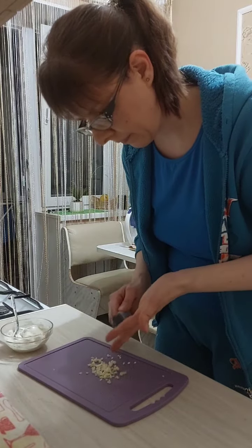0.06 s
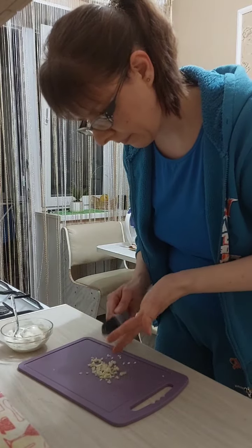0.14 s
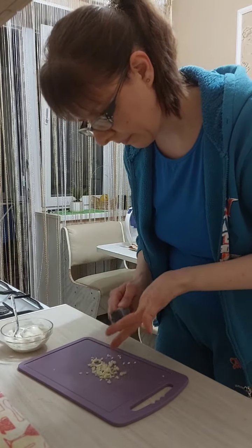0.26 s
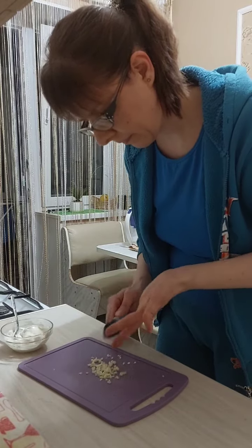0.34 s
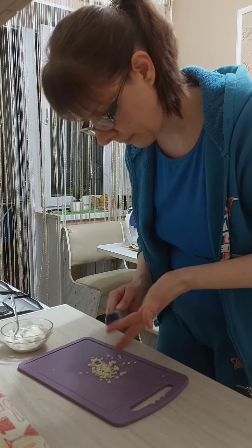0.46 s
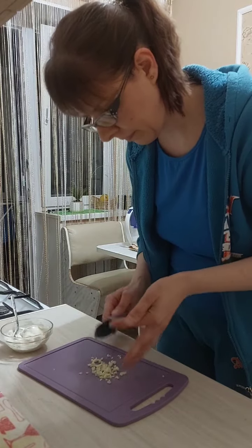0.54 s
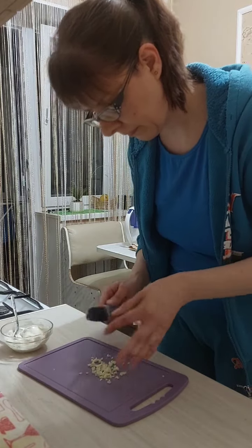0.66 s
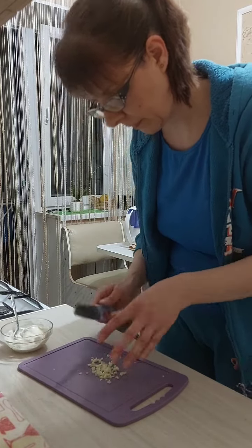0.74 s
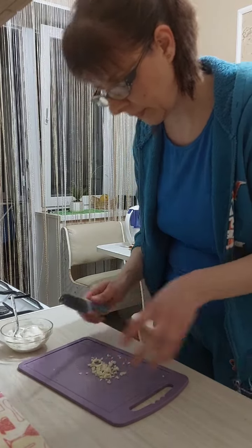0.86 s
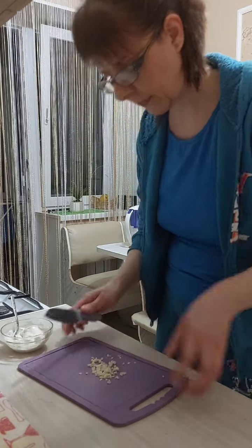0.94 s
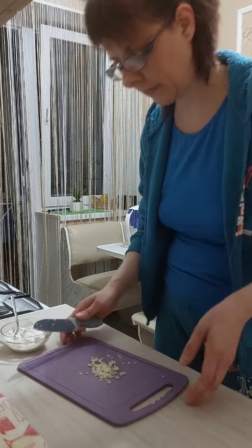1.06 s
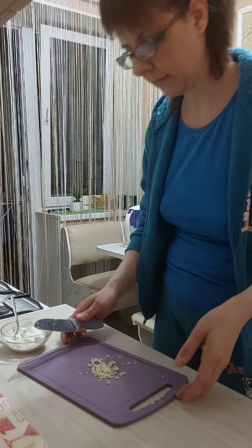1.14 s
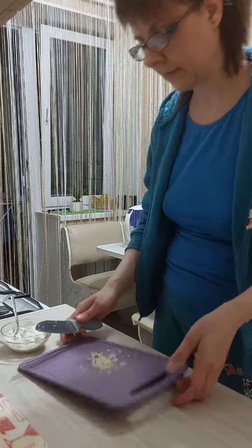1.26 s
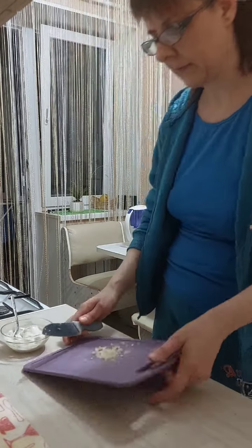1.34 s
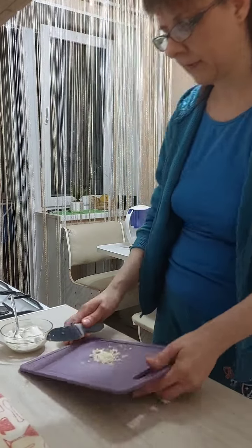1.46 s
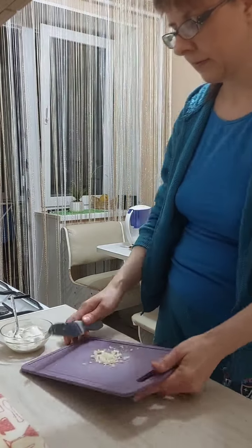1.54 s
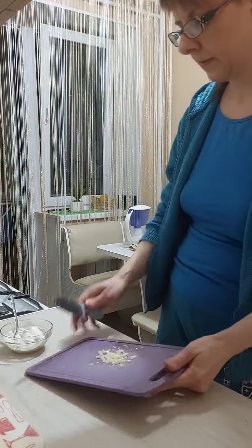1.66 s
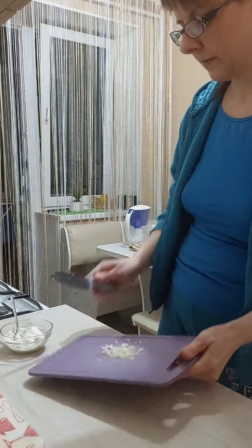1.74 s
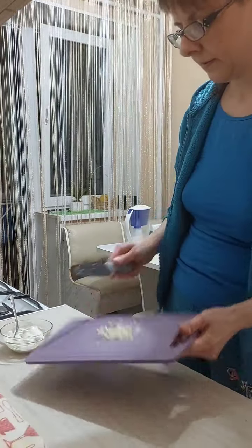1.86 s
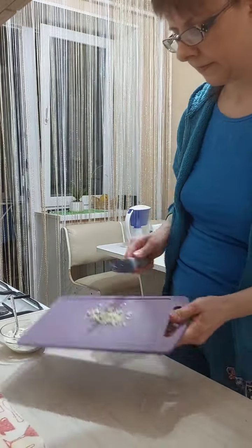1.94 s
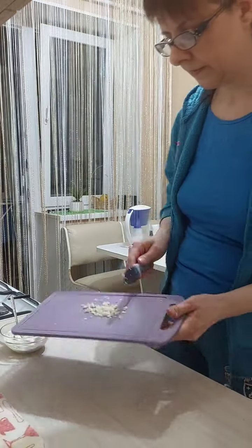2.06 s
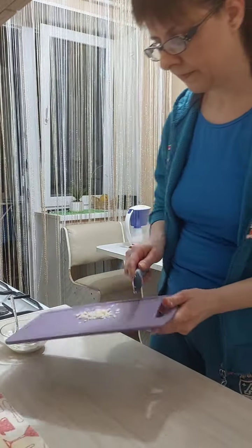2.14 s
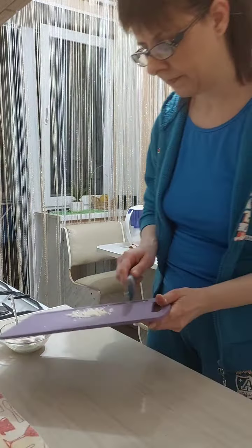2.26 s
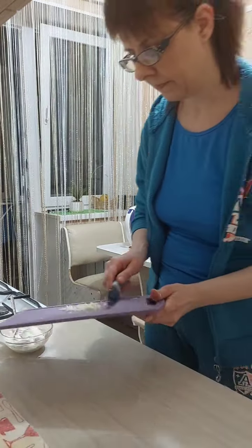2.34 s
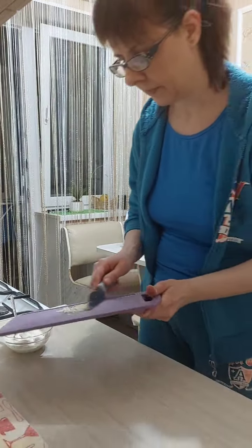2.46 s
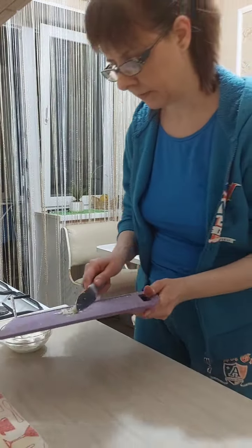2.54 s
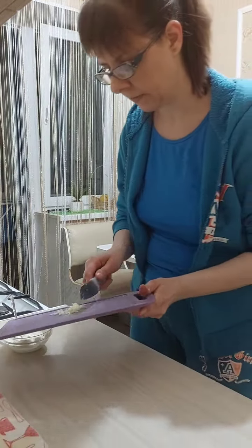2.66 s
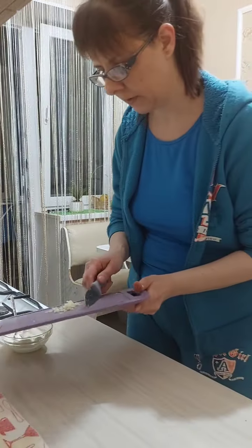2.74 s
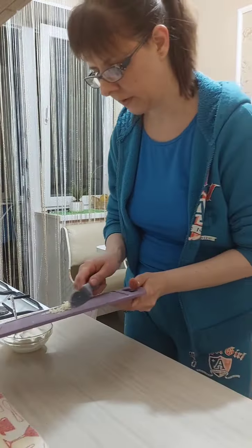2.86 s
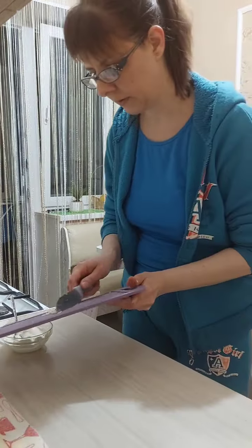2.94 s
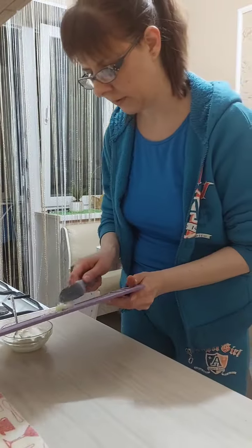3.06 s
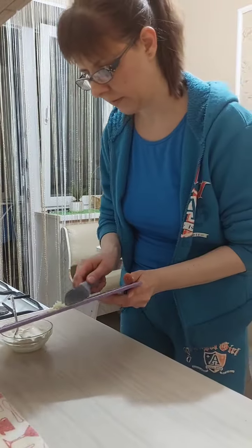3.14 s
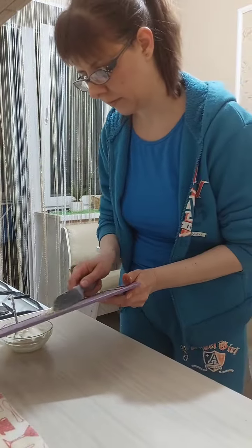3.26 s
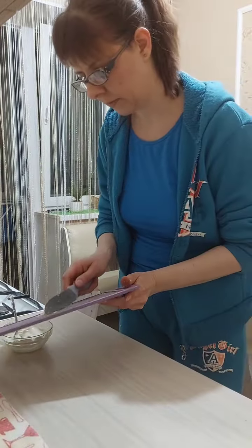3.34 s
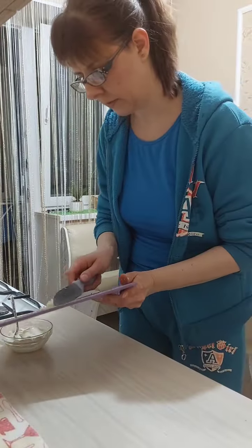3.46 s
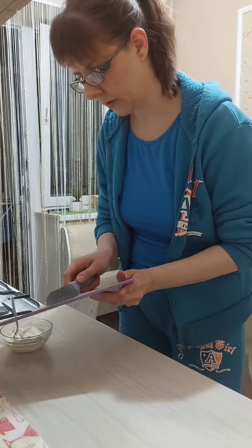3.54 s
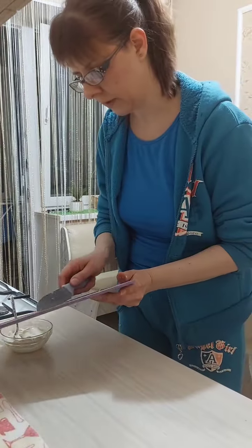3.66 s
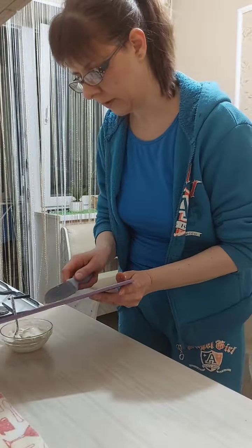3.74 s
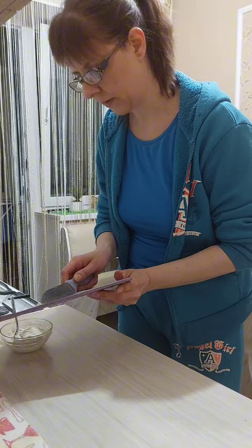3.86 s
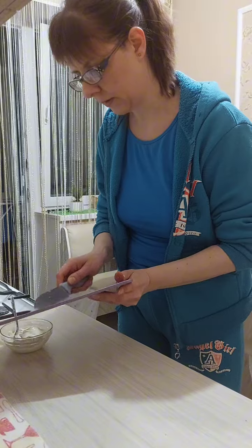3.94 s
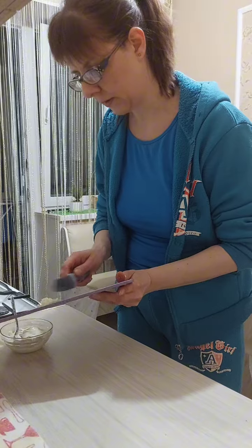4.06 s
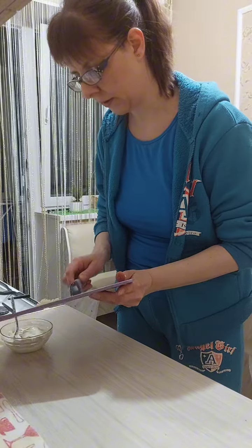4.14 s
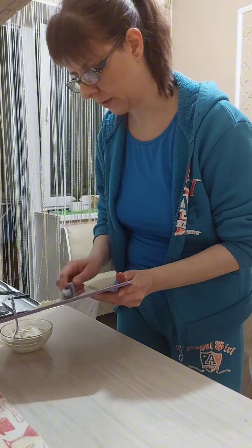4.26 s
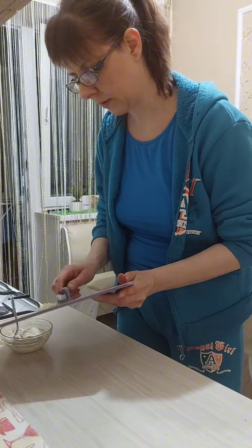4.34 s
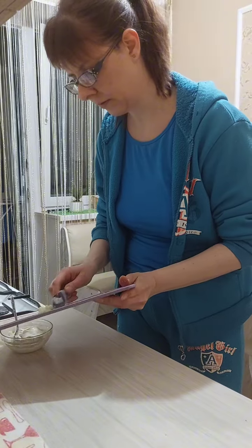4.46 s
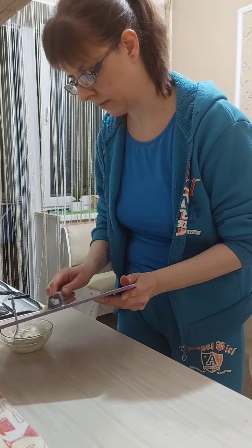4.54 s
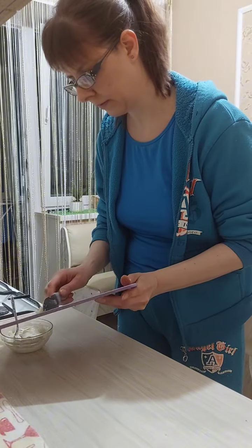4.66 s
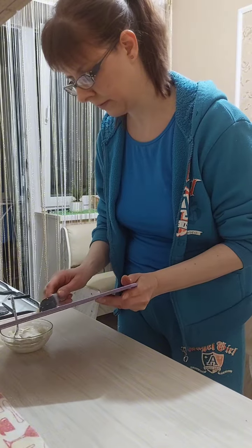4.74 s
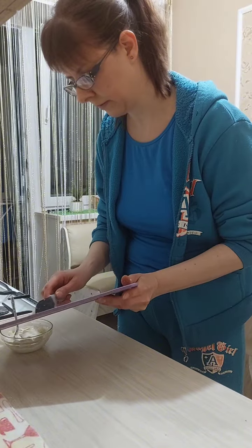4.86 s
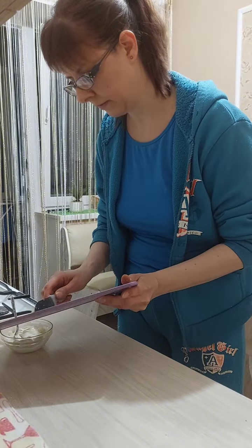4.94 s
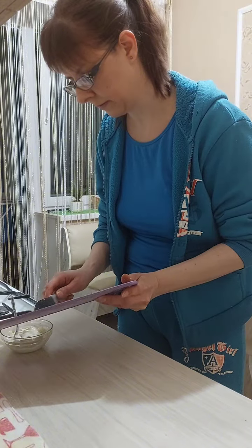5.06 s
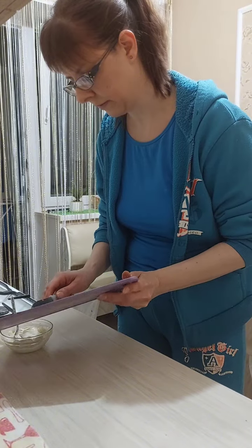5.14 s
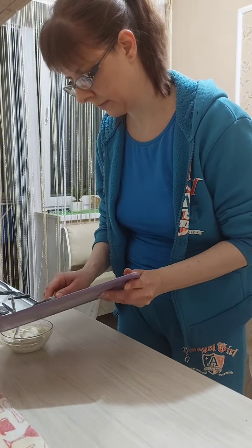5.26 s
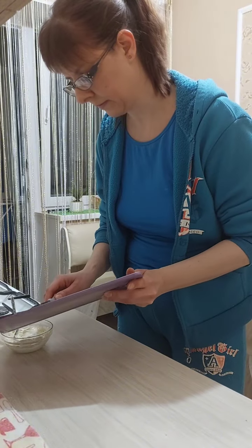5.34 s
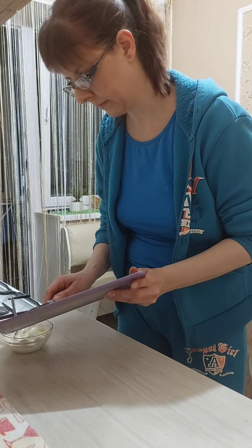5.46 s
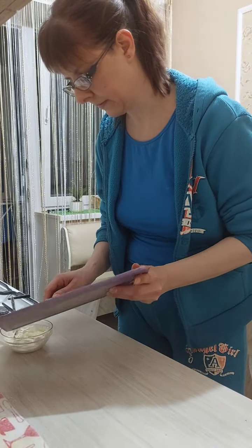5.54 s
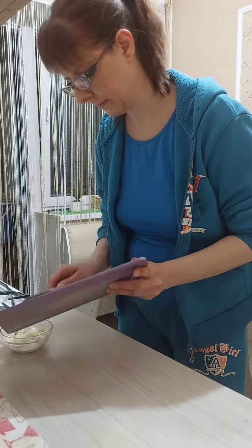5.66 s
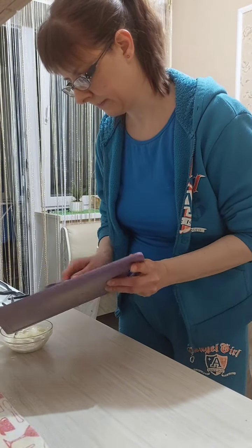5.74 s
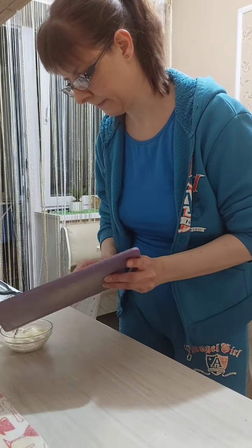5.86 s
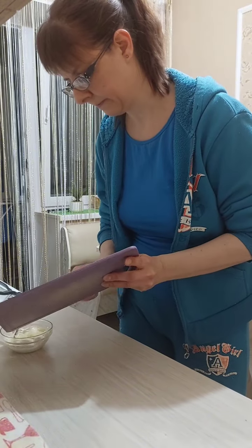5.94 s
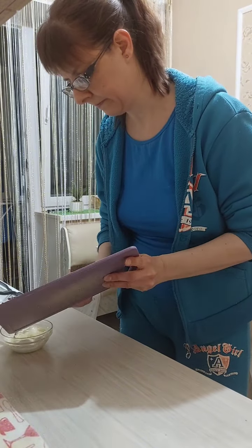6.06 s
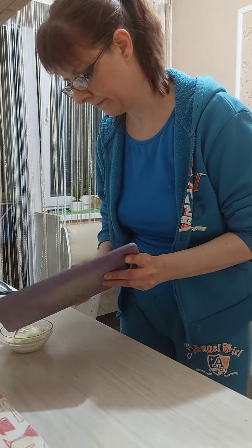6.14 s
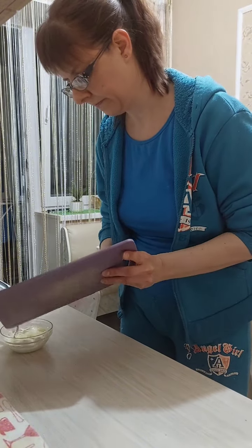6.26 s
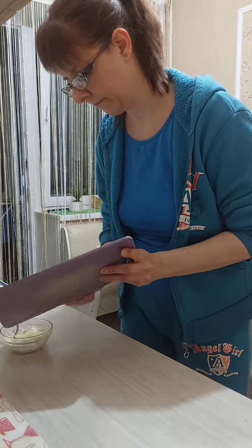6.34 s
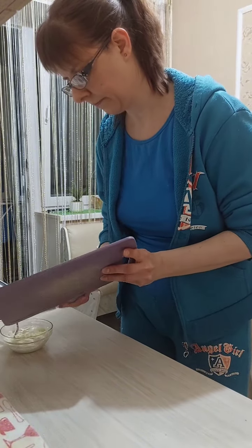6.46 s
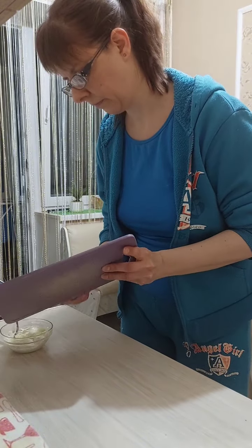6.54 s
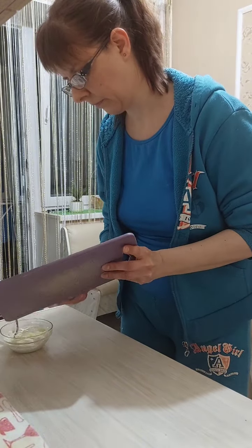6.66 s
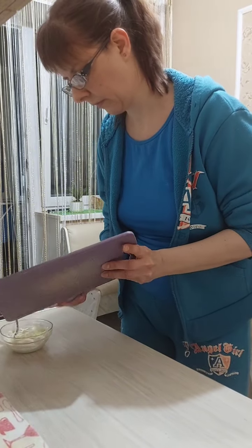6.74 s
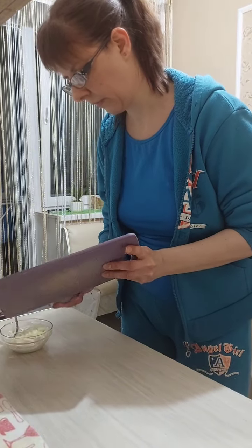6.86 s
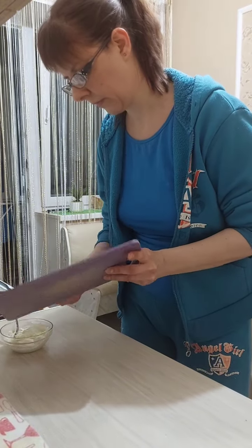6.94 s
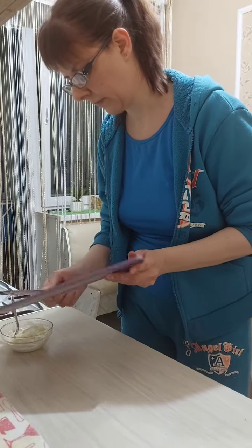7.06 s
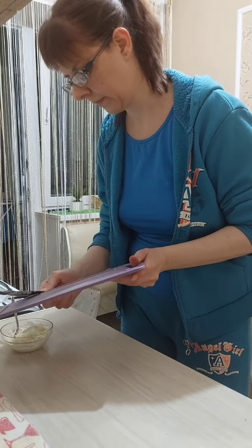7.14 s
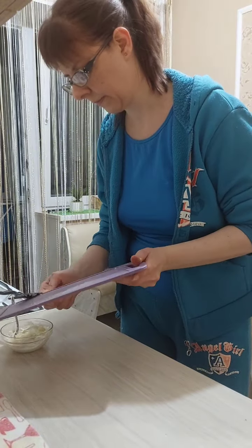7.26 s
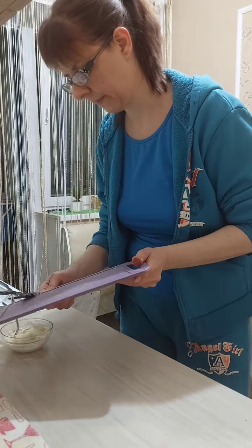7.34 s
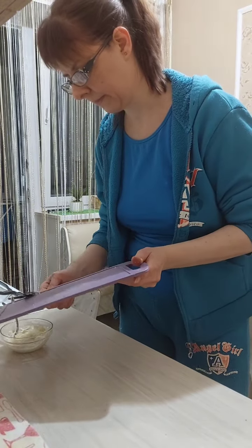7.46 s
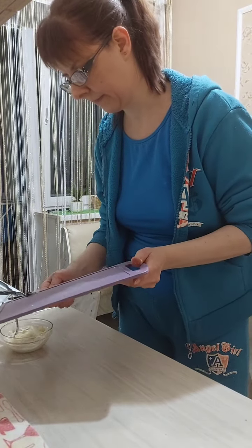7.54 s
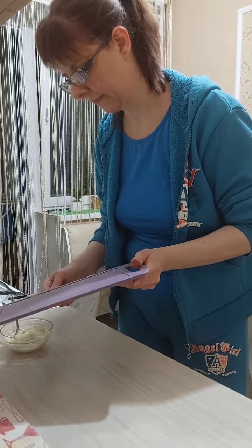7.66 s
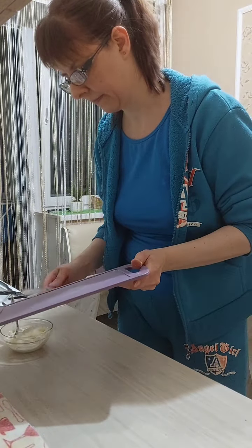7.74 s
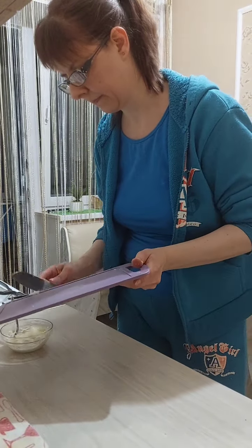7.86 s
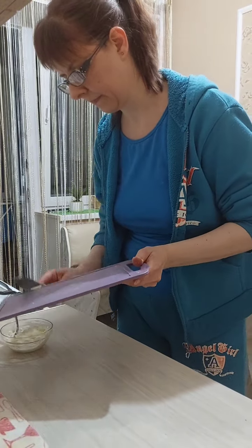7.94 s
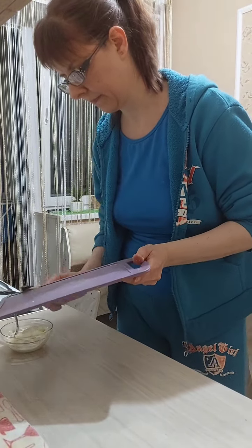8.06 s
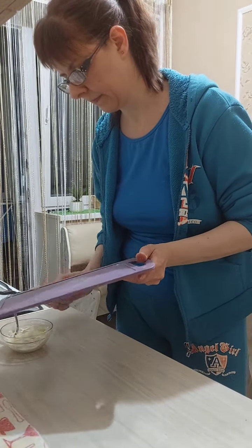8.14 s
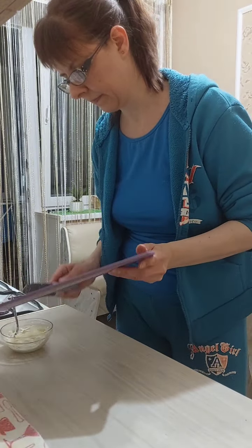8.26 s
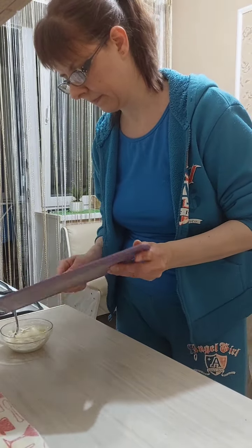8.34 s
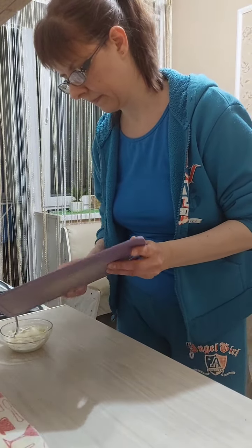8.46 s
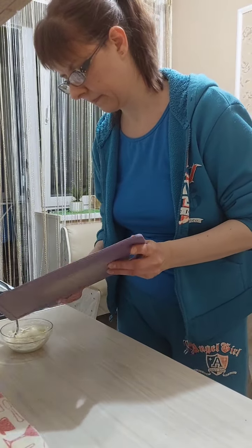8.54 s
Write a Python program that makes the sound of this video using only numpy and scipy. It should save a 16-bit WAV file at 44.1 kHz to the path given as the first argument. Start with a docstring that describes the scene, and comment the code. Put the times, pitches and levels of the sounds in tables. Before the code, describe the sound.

Knife scraping minced garlic off a hollow-sounding plastic board, each stroke starting with a knock, one longer drag midway, in a small humming kitchen.

```python
"""Garlic swept off a cutting board

A plastic board is lifted off a kitchen table; a knife sweeps minced garlic from it into a bowl.
Blade knocks and light taps: noise cracks plus board modes. Slides: random slips, direct and through the board.
Bumps, blurred rings, steel pings, brief squeaks and stick-slip groans: decaying or gliding tones and narrow noise.
A small hard room rings after every sound; a mains appliance hums throughout over rumble and hiss.
"""
import sys
import numpy as np
from scipy import signal
from scipy.fft import rfft, irfft
from scipy.io import wavfile
from scipy.ndimage import map_coordinates

SR = 44100
rng = np.random.default_rng(int(sys.argv[2]) if len(sys.argv) > 2 else 0)


def digitize_waveform(pressure):
    """Quantize a signal to 16-bit integers and store it at the path in sys.argv[1].

    Rows of a 2-D input are taken as channels; values are limited to [-1, 1].
    """
    field = np.atleast_2d(pressure).T
    bounded = np.clip(field, -1, 1)
    quanta = np.round(bounded * 32767).astype(np.int16)
    wavfile.write(sys.argv[1], SR, quanta)


N = 379260

# appliance hum and background spectra: freq_hz, density_db
HUM_HZ, HUM_DB = 100, -37.5
RUMBLE_SPECTRUM = [(20, -25.5), (35, -46), (48, 19.5), (65, 5), (85, 11), (120, 11), (150, 7.5),
                   (220, -54.5)]
AIR_SPECTRUM = [(94, -16.5), (160, -8), (244, -12), (285, -10.5), (571, -27), (653, -29.5), (1020, -38),
                (5870, -51), (11100, -42.5), (16000, -48.5)]

# slides of blade, finger or board; levels at full speed, before hand pressure:
# start_s, speed_up_s, run_s, ease_off_s, rub_db, drag_db, rasp_db, grit_db, hiss_db
STROKES = [(0.09, 0.018, 0.01, 0.03, -99, -84, -89, -85, -77),
           (0.33, 0.015, 0.009, 0.028, -88, -89, -93, -87, -67),
           (1.29, 0.0035, 0.0055, 0.075, -54, -47.5, -47, -58, -55),
           (1.421, 0.02, 0.011, 0.05, -55, -52.5, -50, -58, -58.5),
           (1.615, 0.0088, 0.012, 0.022, -64, -60, -55.5, -60.5, -58),
           (1.719, 0.067, 0.088, 0.11, -61, -74, -82, -73.5, -66),
           (2.35, 0.12, 0.033, 0.039, -47, -39, -35, -40, -42.5),
           (2.8, 0.1, 0.028, 0.057, -48.5, -41, -42.5, -48, -48.5),
           (3.181, 0.078, 0.027, 0.065, -44, -39.5, -42.5, -45.5, -46),
           (3.5, 0.1, 0.03, 0.026, -42.5, -40, -40, -47.5, -46),
           (3.82, 0.08, 0.042, 0.022, -42, -40.5, -39.5, -45, -45),
           (4.076, 0.0034, 0.0041, 0.0094, -42, -35.5, -49.5, -63, -77),
           (4.169, 0.056, 0.42, 0.13, -42, -38, -40.5, -50.5, -51.5),
           (4.71, 0.035, 0.084, 0.07, -46.5, -50.5, -54, -66.5, -68),
           (5.131, 0.0086, 0.078, 0.064, -46.5, -50.5, -51, -59.5, -58),
           (5.27, 0.13, 0.13, 0.01, -55.5, -46, -44.5, -56, -52),
           (5.88, 0.13, 0.039, 0.04, -40, -39.5, -36.5, -43.5, -40),
           (6.348, 0.01, 0.054, 0.031, -45, -42, -38, -42, -35),
           (6.587, 0.015, 0.011, 0.02, -49, -44, -34.5, -43.5, -37.5),
           (6.773, 0.009, 0.01, 0.012, -55.5, -59, -37.5, -40.5, -31.5),
           (7.15, 0.024, 0.046, 0.034, -64.5, -56, -59, -65, -59),
           (7.247, 0.0035, 0.024, 0.087, -66.5, -64, -74, -68.5, -54),
           (7.42, 0.049, 0.14, 0.034, -80, -84, -86, -94, -66),
           (7.59, 0.016, 0.014, 0.011, -85, -87, -79, -70, -64),
           (7.657, 0.004, 0.007, 0.015, -76, -80, -65.5, -66, -57),
           (7.683, 0.0045, 0.0069, 0.011, -75, -57.5, -61, -69, -68),
           (8.02, 0.012, 0.085, 0.012, -53.5, -64, -52.5, -52.5, -51),
           (8.44, 0.073, 0.069, 0.033, -48, -45, -36.5, -42, -36)]
SCRAPE_SPLITS_HZ = (600, 1100, 2900, 5200)
# level at rest relative to full speed: rub_db, drag_db, rasp_db, grit_db, hiss_db
SLOW_DB = (-5.5, -4.5, -11, -10.5, -17)
TIRING_DB_PER_S = -11.5  # the hand presses less as the stroke goes on
EASE_OFF_DB = -13  # further pressure fall from end of run to lift
SLOWING = 0.52  # share of speed lost during ease-off
# a lighter, hissier slide reaches higher: treble tilt per dB of hiss over drag
SHEEN_DB_PER_DB, SHEEN_EVEN_DB, SHEEN_HZ = 0.2, -14, (10000, 13500)
# friction spectrum: freq_hz, density_db
SCRAPE_SPECTRUM = [(120, -56), (300, 5), (850, 4.5), (1130, 1), (1500, -2), (2600, -10), (3300, -7),
                   (4600, -15), (5400, -12), (8500, -5.5), (11700, -4), (13700, -14.5), (15200, -17),
                   (16000, -30)]
# steel blade resonances while dragging: freq_hz, width_hz, level_db
BLADE_RESONANCES = [(2625, 150, -24), (4360, 520, -20.5), (11600, 1000, -21)]
# modes of the hand-held board with the blade on it: freq_hz, level_db, t60_s
BOARD_MODES = [(290.7, 0, 0.16), (464, -1, 0.12), (504.7, 9.5, 0.15), (686.5, -2.5, 0.15),
               (768, 12.5, 0.05), (945.3, 4.5, 0.088), (1291, -5, 0.12), (1467, -14, 0.013),
               (1670, 1.5, 0.063), (1942, -6, 0.07), (2211, -0.5, 0.052), (2552, -10.5, 0.017),
               (2834, -14, 0.026), (4460, -6.5, 0.01)]

# faint squeaks on the wet blade: start_s, end_s, pitch_hz, level_db
SQUEAKS = [(0.353, 0.365, 4000, -70), (0.35, 0.362, 2980, -78), (0.5, 0.51, 3960, -72),
           (0.503, 0.512, 2730, -75), (5.045, 5.155, 3120, -81)]

# light taps of fingers, blade and board: start_s, boom_db, thud_db, clack_db, tick_db
TAPS = [(0.5, -83, -85, -76, -71.5), (1.018, -54, -66, -77, -73), (1.284, -59, -62, -50, -62),
        (1.291, -47.5, -51, -42, -48.5), (1.299, -55, -45.5, -55, -61), (1.31, -69, -55, -60, -65),
        (1.345, -49, -66, -52, -49), (1.456, -57, -62, -58, -59), (1.513, -67, -51, -50.5, -56.5),
        (1.611, -52, -52, -48, -65), (2.165, -68.5, -70, -86, -83), (4.056, -59, -47.5, -54, -68)]
# blade landing on the board: start_s, boom_db, thud_db, clack_db, tick_db
KNOCKS = [(2.33, -40.5, -24.5, -21, -31.5), (2.779, -41, -29.5, -33.0, -54),
          (3.162, -36.5, -28, -28.5, -48.5), (3.481, -35, -28, -29, -48.5),
          (3.804, -37, -30.5, -30.5, -53.5), (4.149, -41, -24, -25.5, -44), (5.849, -32.5, -24.5, -32, -56),
          (6.289, -33.5, -24, -30.5, -46), (6.576, -35, -32.5, -29.0, -47),
          (6.761, -33, -33.5, -26.5, -36.5), (7.13, -56, -40, -47, -46), (7.999, -40.5, -54, -35, -40.5),
          (8.408, -39, -41, -39.0, -50)]
KNOCK_SPLITS_HZ = (380, 1200, 5500)
# contact noise spectra: freq_hz, density_db
TAP_SPECTRUM = [(100, -21.5), (300, -5.5), (800, -3), (1500, 3.5), (2400, 0.5), (3500, -6), (4800, -9),
                (6000, -17.5), (11500, -18), (14000, -26)]
KNOCK_SPECTRUM = [(100, -28.5), (280, -21.5), (700, 4), (1150, -7), (2400, -2.5), (3400, -21.5),
                  (4600, -14), (5400, -23), (8500, -21.5), (11500, -19), (13500, -29), (16000, -58)]

# soft bumps of hand and board on the table: start_s, pitch_hz, level_db
BUMPS = [(0.999, 135, -39.5), (1.128, 148.6, -37), (1.291, 130, -37.5), (1.482, 136, -41),
         (1.608, 110.4, -35)]
# faint rings as the board is picked up, pressed and tilted: start_s, pitch_hz, level_db, t60_s
RINGS = [(1.51, 851, -60, 3.4), (1.60, 522, -52, 0.97), (2.168, 800, -64, 2.5), (2.42, 980, -43, 0.43),
         (6.77, 570, -50.5, 0.55), (6.77, 955, -54, 1.5)]

# the blade edge is clipped and the steel rings: start_s, level_db
PINGS = [(1.291, -57), (1.346, -56), (2.33, -38), (7.999, -42)]
# free blade modes: freq_hz, level_db, t60_s
STEEL_MODES = [(1868, 2, .14), (2210, 1.5, 0.29), (2470, -2.5, .16), (3348, -7.5, .2), (4680, -12.5, .4),
               (4960, -14, .4)]

# stick-slip groans: start_s, end_s, first_hz, last_hz, level_db, step_per_overtone_db
JUDDERS = [(2.3, 2.447, 171, 176.4, -48.5, -2), (2.42, 2.58, 196.3, 210, -46.5, -26.5),
           (2.794, 2.832, 254.4, 220.6, -38.5, -1.5), (2.827, 2.929, 453, 457, -41.5, -7),
           (2.92, 2.996, 228, 210, -54, -23), (3.58, 3.694, 182.6, 154.3, -44.5, -9.5),
           (3.856, 3.942, 424, 394, -42, -33.5), (3.857, 3.98, 202, 199.4, -49, -5.5),
           (4.063, 4.1, 161.5, 157.3, -39, -1.5), (5.855, 5.976, 273, 259.6, -47, 2)]

# kitchen reverberation: freq_hz, t60_s
KITCHEN_DECAY = [(200, 0.48), (550, 0.35), (1400, 0.41), (4000, 0.39), (6000, 0.36), (10000, 0.26),
                 (14000, 0.23)]
# level at the two ports: freq_hz, left_minus_right_db
PORT_BALANCE = [(60, 3), (110, 0.5), (200, -5.5), (380, 3), (700, -7.5), (1290, -3), (2380, -6), (4400, -5),
                (8120, 0.5), (15000, -9.5)]
TOP_HZ = 16100


def undb(db):
    """Decibels to gain."""
    return 10 ** (np.asarray(db) / 20)


def unit(x):
    """Scale to rms 1."""
    return x / np.sqrt(np.mean(x ** 2) + 1e-20)


def fade(t, t60):
    """Exponential decay, 60 dB in t60."""
    return undb(-60 * t / t60)


def colour(x, points):
    """Shape a sound by a (Hz, dB) spectrum, interpolated over log frequency."""
    hz, db = np.transpose(points)
    freq_hz = np.maximum(np.fft.rfftfreq(x.shape[-1], 1 / SR), 1)
    gain = undb(np.interp(np.log(freq_hz), np.log(hz), db))
    return irfft(rfft(x) * gain, x.shape[-1])


def butter(x, hz, kind, order=4):
    """Causal Butterworth filter."""
    return signal.sosfilt(signal.butter(order, hz, kind, fs=SR, output="sos"), x)


def narrow(x, hz, width_hz, order=1):
    """One resonance driven by x, at rms 1."""
    band_hz = (hz - width_hz / 2, hz + width_hz / 2)
    return unit(butter(x, band_hz, "band", order=order))


def registers(x, splits_hz):
    """Split a sound into registers, lowest first."""
    inner = [butter(x, pair, "band") for pair in zip(splits_hz, splits_hz[1:])]
    return [butter(x, splits_hz[0], "low"), *inner, butter(x, splits_hz[-1], "high")]


def add(out, start_s, x):
    """Mix x into out at start_s."""
    i = max(int(start_s * SR), 0)
    out[i:i + len(x)] += x[:N - i]


def tremble(n, hz):
    """Smooth random motion of spread 1, low-passed at hz."""
    return unit(butter(rng.standard_normal(2 * SR), hz, "low", order=2))[-n:]


def background(octave_db=-33, rumble_db=-52, right_db=1.23, air_db=-59.5, side_db=2):
    """Mains hum and low rumble common to both ports, under a faint hiss that differs between them."""
    phase = 2 * np.pi * HUM_HZ * np.arange(N) / SR
    hum = unit(np.sin(phase) + undb(octave_db) * np.sin(2 * phase)) * undb(HUM_DB)
    rumble = unit(colour(rng.standard_normal(N), RUMBLE_SPECTRUM)) * undb(rumble_db)
    mid, side = (unit(colour(rng.standard_normal(N), AIR_SPECTRUM)) * undb(air_db) for _ in range(2))
    side = undb(side_db) * butter(side, 900, "high", order=1)
    sign = np.array([[-1], [1]])  # left, right
    return (hum + rumble + mid + sign * side) * undb(sign * right_db)


def board_ring(t, place_db=2.0, grip=0.014):
    """The board's answer to a push; contact place and grip vary each mode's strength and pitch."""
    hz, db, t60 = np.transpose(BOARD_MODES)[:, :, None]
    place, detune = rng.standard_normal((2, len(BOARD_MODES), 1))
    strength = undb(db + place_db * place)
    tones = np.sin(2 * np.pi * hz * (1 + grip * detune) * t)
    return np.sum(strength * fade(t, t60) * tones, axis=0)


def gesture(t, speed_up_s, run_s, ease_off_s, edge_s=0.012):
    """One hand sweep as speed (0-1) and pressure (a gain): it gathers, runs on, then slows and lifts."""
    gathering = np.sin(np.pi / 2 * np.clip(t / speed_up_s, 0, 1)) ** 2
    easing = np.clip((t - speed_up_s - run_s) / ease_off_s, 0, 1)
    until_end_s = speed_up_s + run_s + ease_off_s - t
    touch = np.clip(np.minimum(t, until_end_s) / edge_s + 1, 0, 1)
    pressure_db = TIRING_DB_PER_S * (t - speed_up_s) + EASE_OFF_DB * easing ** 2
    return gathering * (1 - SLOWING * easing), touch * undb(pressure_db)


def crumbs(n, grit_db, per_s=55, crunch_db=6, full_grit_db=-43, crunch_s=.0015):
    """Gain on the slips: a hard-pressed edge snags on crumbs and deeper cuts, a light one glides over."""
    snags = (rng.random(n) < per_s / SR) * rng.uniform(.3, 1, n)
    bite = undb(crunch_db + min(grit_db - full_grit_db, 0))
    return 1 + bite * signal.lfilter([1], [1, -np.exp(-1 / (crunch_s * SR))], snags)


def scrapes(catches_hz=4000, ring_db=-2, shift=0.022):
    """The edge catches on countless scratches and crumbs; tiny slips sound directly and through the board."""
    out, second = np.zeros(N), np.arange(SR) / SR
    t = second - .02
    for start_s, speed_up_s, run_s, ease_off_s, *levels_db in STROKES:
        _, drag_db, _, grit_db, hiss_db = levels_db
        catches = rng.random(SR) < catches_hz / SR
        slips = catches * rng.choice([-1, 1], SR)
        # hand pressure trembles; the edge stutters over old knife cuts
        unsteady_db = 1.9 * tremble(SR, 50) + 3.2 * tremble(SR, 400)
        slips = slips * crumbs(SR, grit_db) * undb(unsteady_db)

        body = signal.fftconvolve(slips, board_ring(second[:SR // 5]))[:SR]
        body = butter(body, 350, "high", order=2)
        # the travelling blade loads the board differently, so its modes wander
        warped_time = np.cumsum(1 + shift * tremble(SR, 8.2))
        body = map_coordinates(body, [warped_time], mode="mirror")
        blade = sum(undb(db) * narrow(slips, hz, width_hz) for hz, width_hz, db in BLADE_RESONANCES)

        friction = unit(colour(slips, SCRAPE_SPECTRUM)) + undb(ring_db) * unit(body) + blade
        sheen_db = SHEEN_DB_PER_DB * (hiss_db - drag_db - SHEEN_EVEN_DB)
        friction = colour(friction, list(zip(SHEEN_HZ, (0, sheen_db))))

        # pressure sets loudness, speed sets brightness
        speed, pressure = gesture(t, speed_up_s, run_s, ease_off_s)
        for part, db, slow_db in zip(registers(friction, SCRAPE_SPLITS_HZ), levels_db, SLOW_DB):
            gain = pressure * undb(db + slow_db * (1 - speed))
            add(out, start_s + t[0], unit(part) * gain)
    return out


def squeaks(wobble=0.045):
    """Fast, unsteady stick-slip on wet steel; it starts quickly and dies away."""
    out = np.zeros(N)
    for start_s, end_s, hz, db in SQUEAKS:
        n = int((end_s - start_s) * SR)
        phase = 2 * np.pi * np.cumsum(hz * (1 + wobble * tremble(n, 350))) / SR
        envelope = np.sin(np.pi * np.sqrt(np.linspace(0, 1, n))) ** 2
        add(out, start_s, unit(np.sin(phase) * envelope) * undb(db))
    return out


def blows(table, spectrum, crack_t60, ring_db, settle_s, slap=1.0):
    """A contact at one point, then a flat slap a moment later; both crack, and the board rings."""
    out, t = np.zeros(N), np.arange(SR // 5) / SR
    attack = slice(0, SR // 50)
    for start_s, *levels_db in table:
        second_contact = (t > settle_s) * fade(np.abs(t - settle_s), crack_t60)
        contact = fade(t, crack_t60) + slap * second_contact
        crack = colour(rng.standard_normal(len(t)), spectrum) * contact
        blow = unit(crack) + undb(ring_db) * unit(board_ring(t))
        blow = butter(blow, 130, "high", order=2)
        blow = butter(blow, 13500, "low", order=2)
        # place and hardness of the contact set the strength of each register
        for part, db in zip(registers(blow, KNOCK_SPLITS_HZ), levels_db):
            add(out, start_s, part * undb(db) / np.std(part[attack]))
    return out


def lifting(bump_t60=0.29, spread=0.16):
    """Dull decaying tones as the board bumps the table, and faint rings of narrow noise."""
    out, t = np.zeros(N), np.arange(SR) / SR
    swell = 1 - np.exp(-t / 0.0049)
    for start_s, hz, db in BUMPS:
        add(out, start_s, undb(db) * swell * fade(t, bump_t60) * np.sin(2 * np.pi * hz * t))
    for start_s, hz, db, t60 in RINGS:
        ring = narrow(rng.standard_normal(SR), hz, spread * hz, order=2)
        add(out, start_s, undb(db) * swell * fade(t, t60) * ring)
    return out


def pings(blur=.015):
    """The blade's modes ring briefly; the grip on it blurs each pitch."""
    out, t = np.zeros(N), np.arange(SR // 2) / SR
    for start_s, level_db in PINGS:
        for hz, db, t60 in STEEL_MODES:
            phase = 2 * np.pi * np.cumsum(hz * (1 + blur * tremble(len(t), 200))) / SR
            add(out, start_s, undb(level_db + db) * fade(t, t60) * np.sin(phase))
    return out


def judders(wobble=0.021):
    """Nearly regular stick-slip of the blade: a low gliding tone with nine overtones."""
    out = np.zeros(N)
    for start_s, end_s, first_hz, last_hz, db, overtone_db in JUDDERS:
        n = int((end_s - start_s) * SR)
        hz = np.linspace(first_hz, last_hz, n) * (1 + wobble * tremble(n, 82))
        phase = 2 * np.pi * np.cumsum(hz) / SR
        tone = sum(undb(overtone_db * k) * np.sin((k + 1) * phase) for k in range(10))
        add(out, start_s, unit(tone * signal.windows.tukey(n, .7)) * undb(db))
    return out


def ports(left, right):
    """The phone's body shades the two ports unequally across frequency, the left mostly more."""
    hz, db = np.transpose(PORT_BALANCE)
    shaded = []
    for x, sign in ((left, 1), (right, -1)):
        padded = np.pad(x, (0, SR // 10))
        shaded.append(colour(padded, np.transpose([hz, sign * db / 2])))
    return np.array(shaded)[:, :N]


def kitchen(x, wet_db, lag_s, first_wall_s=0.0018, near_db=0, near_t60=0.077, alike_hz=380):
    """Sound reaches the left port first; table, board and walls scatter it, the treble dying soonest."""
    t = np.arange(SR * 3 // 5) / SR
    hz, t60 = np.transpose(KITCHEN_DECAY)
    edges_hz = np.geomspace(100, 18000, 13)
    noise = rfft(rng.standard_normal((2, len(t))))
    freq_hz = np.fft.rfftfreq(len(t), 1 / SR)
    # long waves reach both ports alike
    alike = 1 / (1 + (freq_hz / alike_hz) ** 4)
    noise = np.array([noise[0], alike * noise[0] + np.sqrt(1 - alike ** 2) * noise[1]])

    tail = 0
    for low_hz, high_hz in zip(edges_hz, edges_hz[1:]):
        band = irfft(noise * ((freq_hz >= low_hz) & (freq_hz < high_hz)), len(t))
        tail = tail + band * fade(t, np.interp(np.sqrt(low_hz * high_hz), hz, t60))
    onset = np.clip(t / first_wall_s - 1, 0, 1)
    # nearby surfaces make the first reflections stronger
    tail = tail * onset * (1 + undb(near_db) * fade(t, near_t60))
    tail = tail / np.sqrt(np.sum(tail ** 2, axis=1, keepdims=True))

    wet = undb(wet_db) * signal.fftconvolve(x[None], tail, axes=1)[:, :N]
    late = np.pad(x, (int(abs(lag_s) * SR), 0))[:N]
    return ports(x + wet[0], late + wet[1])


def scene():
    """Knife and board in the kitchen; slides spread more of their sound into the room than blows."""
    knocks = blows(KNOCKS, KNOCK_SPECTRUM, crack_t60=0.015, ring_db=-8.5, settle_s=0.0028)
    taps = blows(TAPS, TAP_SPECTRUM, crack_t60=0.011, ring_db=-14, settle_s=0.002, slap=.7)
    struck = kitchen(knocks + pings() + lifting() + squeaks(), wet_db=-4.5, lag_s=.00031)
    rubbed = kitchen(scrapes() + judders(), wet_db=0.0, lag_s=.00046)
    tapped = kitchen(taps, wet_db=-3.5, lag_s=.0003)
    return struck + rubbed + tapped + background()


def record(dry, drive=0.71):
    """The phone rounds the loudest peaks and cuts the top."""
    rounded = np.tanh(drive * dry) / drive
    low_pass = signal.ellip(8, .1, 60, TOP_HZ, fs=SR, output="sos")
    return signal.sosfiltfilt(low_pass, rounded)


dry = scene()
out = record(dry)
digitize_waveform(out)
```